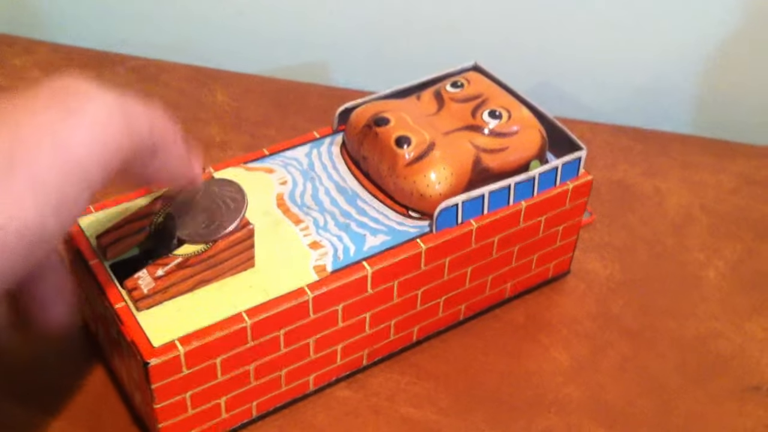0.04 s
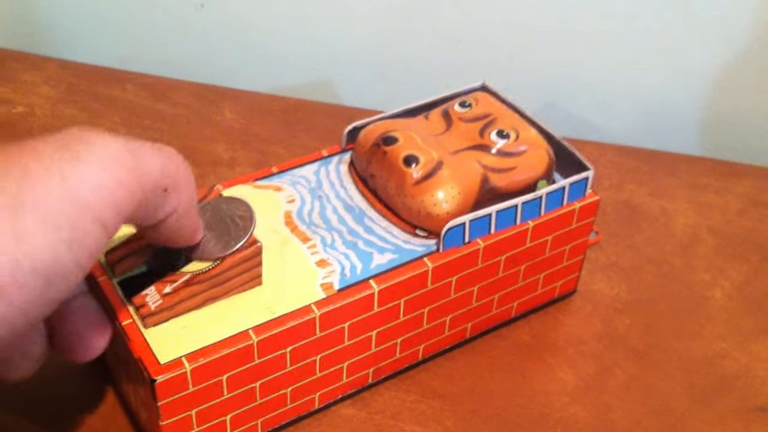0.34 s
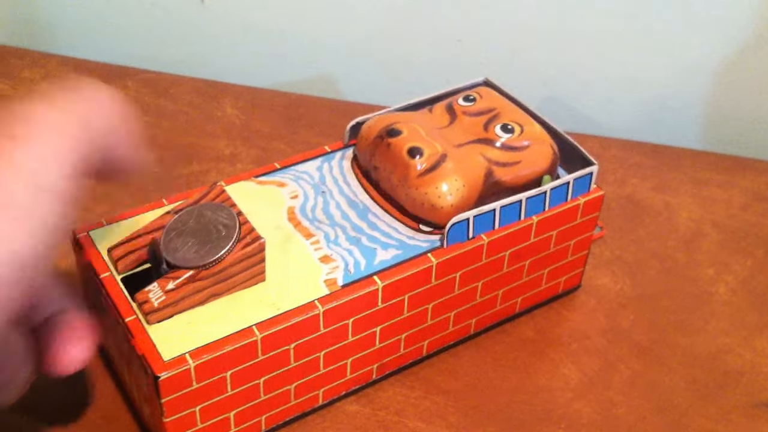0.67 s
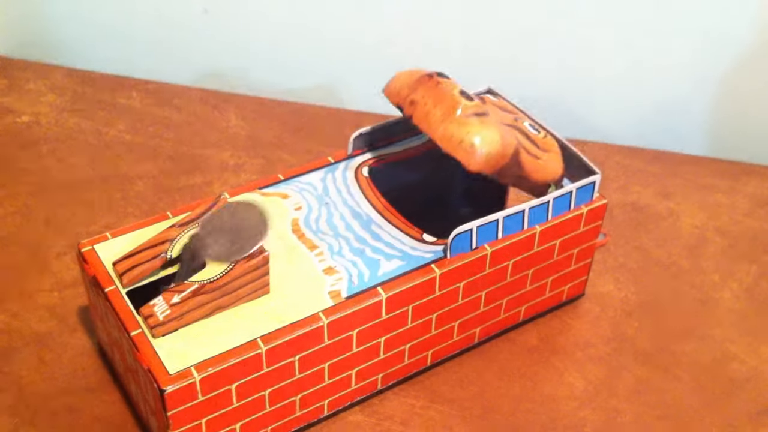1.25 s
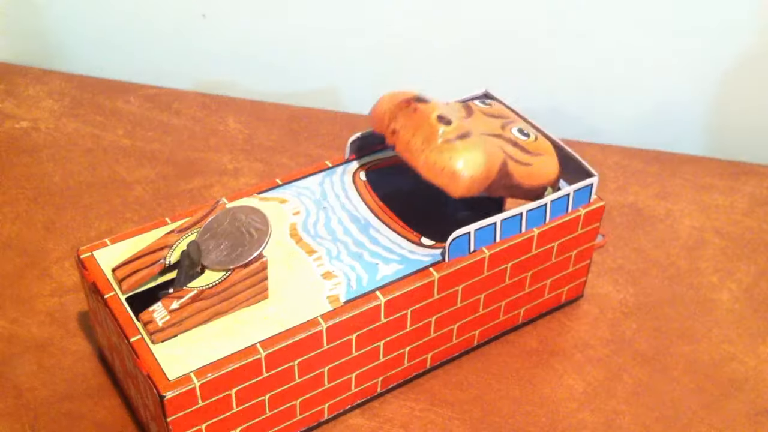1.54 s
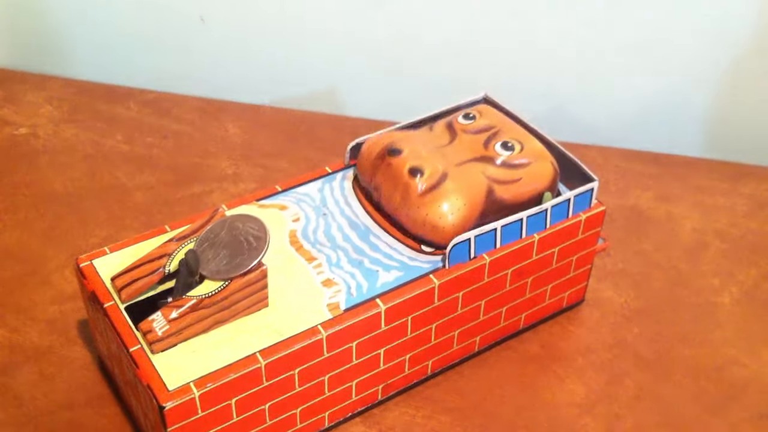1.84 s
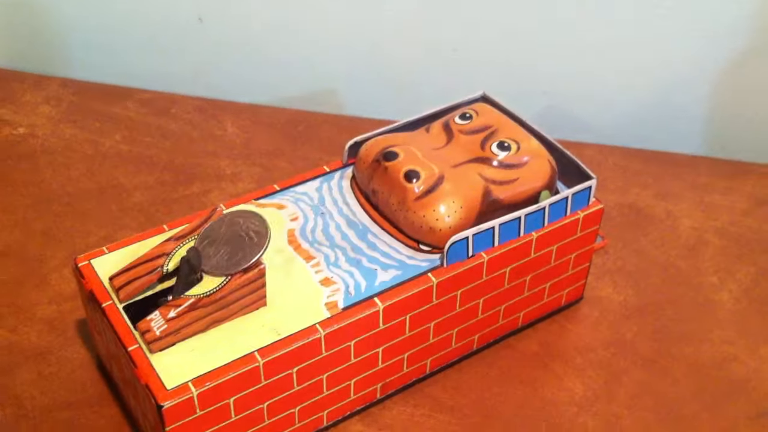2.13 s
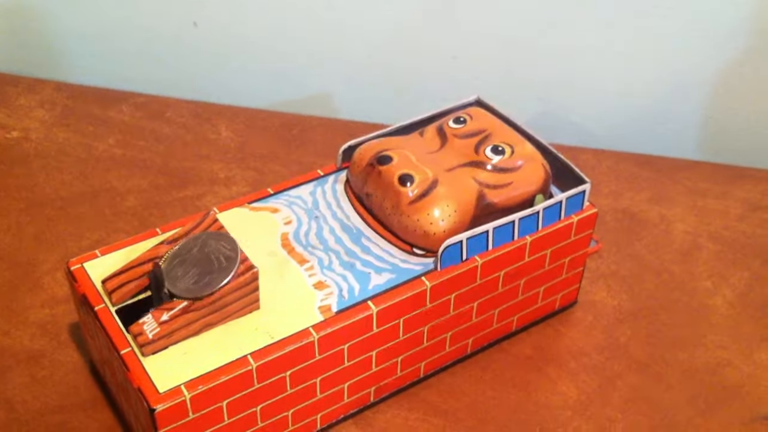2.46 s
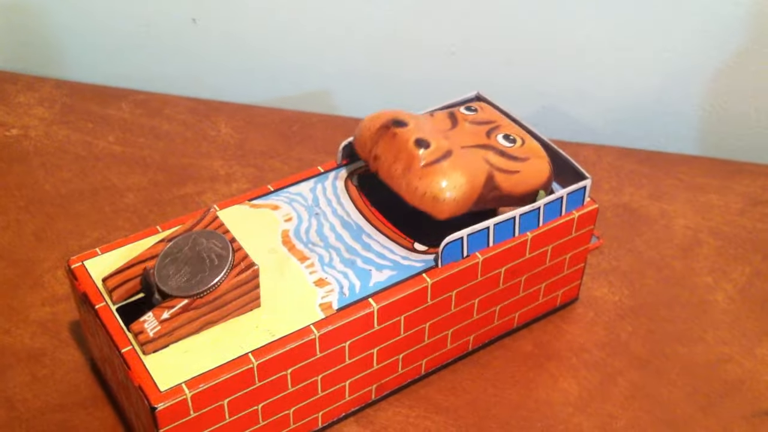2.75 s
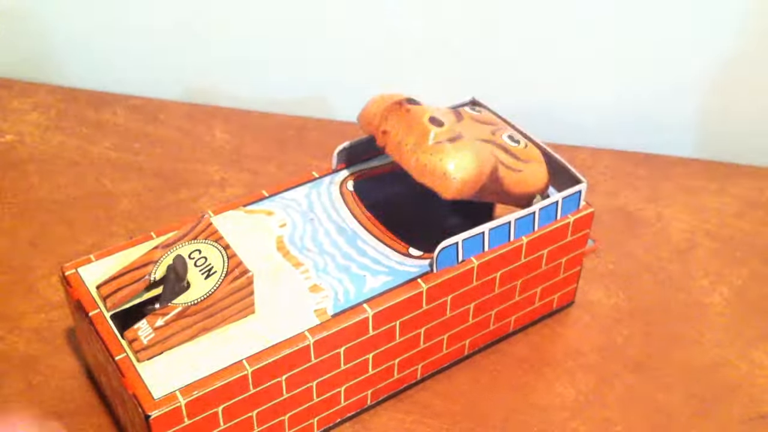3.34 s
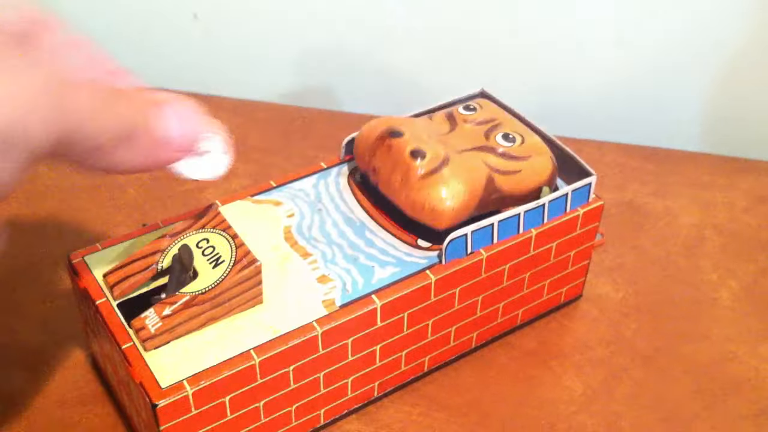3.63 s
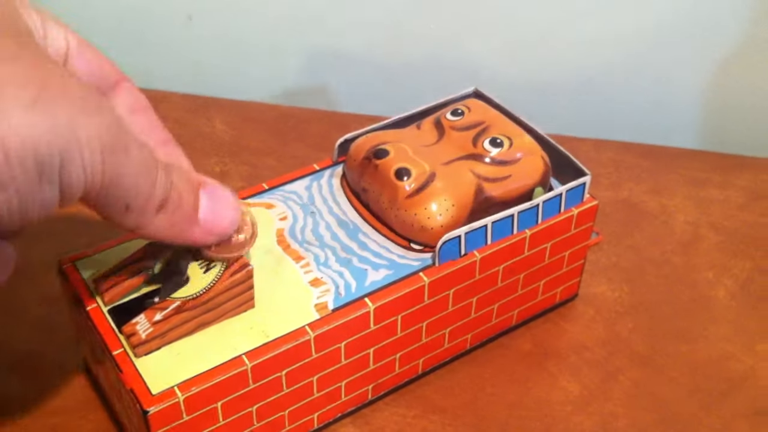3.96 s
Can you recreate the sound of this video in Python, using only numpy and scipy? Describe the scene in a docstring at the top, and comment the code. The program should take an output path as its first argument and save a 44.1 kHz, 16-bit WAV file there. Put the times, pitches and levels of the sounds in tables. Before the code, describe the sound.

Close up in a quiet room, a wind-up tin toy gives faint squeaks and clicks, then jolts into a loud, buzzing whirr with scattered knocks. A coin drops inside with a clank and the motor runs on.

```python
"""A quiet room, with a clockwork tin coin bank on a table. Its lever squeaks and clicks, then the
spring motor jolts into motion: the escapement ticks some 150 times a second and loose gears chatter,
all ringing through the tin case. The linkage knocks now and then. A coin drops inside with a clank
that makes the automatic gain control duck."""
import sys
import numpy as np
from scipy import signal
from scipy.fft import rfft, irfft
from scipy.io import wavfile

SR = 44100
rng = np.random.default_rng(int(sys.argv[2]) if len(sys.argv) > 2 else 0)


def master_out(mix):
    """Clip the mix to full scale and print it as 16-bit PCM to the path in sys.argv[1]."""
    frames = np.transpose(np.atleast_2d(mix))
    ceiling = np.clip(frames, -1, 1)
    pcm = np.round(ceiling * 32767).astype(np.int16)
    wavfile.write(sys.argv[1], SR, pcm)


N = 176400
TIME = np.arange(N) / SR
MOTOR_START_S, TOOTH_JITTER_S, TOOTH_SPREAD_DB = .646, .00013, 3

# pace of the escapement: time_s, teeth_per_s
MOTOR_SPEED = [(.65, 156), (.9, 151), (1.14, 143), (1.37, 172), (1.5, 169), (1.7, 163), (2.2, 156),
               (2.4, 137), (2.65, 152), (2.8, 155), (3.0, 145), (3.16, 160), (3.4, 158), (4.0, 157)]
# three faders riding the rattle, ahead of each band's trim: time_s, treble_db, middle_db, lows_db
RATTLE_FADERS = [(0.68, -19, -22, -31.5), (0.76, -20.5, -23.5, -33), (0.92, -19, -20.5, -33),
                 (1.17, -20.5, -24.5, -34.5), (1.21, -18.5, -20.5, -32.5), (1.4, -17, -20.5, -32),
                 (1.5, -19, -23, -32), (1.59, -18.5, -21, -32), (1.97, -18, -22, -30.5),
                 (2.42, -20, -21.5, -33), (2.52, -22, -24, -34.5), (2.54, -22.5, -21, -32),
                 (2.59, -20, -23, -32.5), (2.71, -20, -20.5, -31.5), (3.07, -20.5, -21.5, -32),
                 (3.15, -18, -19.5, -30.5), (3.31, -20, -23.5, -33), (3.42, -20.5, -22.5, -31),
                 (3.65, -20, -23, -32), (3.86, -19.5, -22, -32)]
# swell of the case's bright ring: time_s, lift_db
RING_LIFT = [(.72, -6), (1.0, 1.5), (1.25, 2), (1.38, 0.5), (1.5, 1), (1.6, 5), (1.75, 2), (1.88, -1),
             (2.25, 1), (2.38, 2.5), (2.55, 0.5), (3.12, -1), (3.28, 5.5), (3.45, 3.5), (4.0, -0.5)]
# broad tone of the tin case: frequency_hz, relative_db
CASE_EQ = [(30, -54), (70, -47), (110, -27.5), (200, -27), (300, -20), (520, -14), (740, -20), (950, -8),
           (1400, -9), (1750, -7.5), (1950, -10), (2400, -11.5), (2750, -14.5), (3200, -6), (3900, -5),
           (4600, -4.5), (5300, -3.5), (6000, -0.5), (6900, -11.5), (8000, -5), (9500, 0), (11300, -2),
           (12200, -5.5), (14000, -8.5), (15700, -17)]
# resonances of the case's panels: pitch_hz, width_hz, lift_db
PANEL_RINGS = [(161, 15, 12), (300, 22, 8), (408, 60, 10), (574, 33, 9), (683, 32, 10), (795, 28, 17),
               (868, 12, 6), (910, 22, 10.5), (1046, 34, 10.5), (1275, 36, 11.5), (1500, 30, 4),
               (1552, 44, 10.5), (1660, 62, 7), (1829, 28, 6), (2667, 70, 14), (2848, 42, 10),
               (2963, 98, 11), (3225, 92, 4), (3568, 58, 9), (3790, 130, -3), (4196, 119, 4), (4405, 80, 7),
               (4727, 130, 5), (5030, 110, 3), (6230, 90, 3), (6380, 130, 9.5), (6590, 80, -3),
               (6724, 85, 5), (6887, 95, 9), (7167, 55, 9), (7250, 50, -2), (7429, 148, 11), (7775, 55, 8),
               (7885, 50, 4), (8132, 58, 6), (8222, 55, 7), (8355, 45, 6), (8513, 90, 4), (8790, 120, 5.5),
               (9020, 60, -3), (9110, 70, 3), (9218, 55, 6), (9330, 70, 5.5), (11139, 97, 3),
               (11495, 113, 5)]
# the coin lands and bounces: start_s, level_db, t60_s
COIN_HITS = [(3.3533, -4, 0.027), (3.358, -5, 0.024), (3.363, -11.5, 0.08)]
# tone of the coin's clank: frequency_hz, relative_db
COIN_EQ = [(60, -18), (250, -12), (350, 11), (600, 5.5), (900, 0), (1130, 15), (1300, 5), (1520, 3),
           (1750, 18.5), (2200, 6), (2700, 5.5), (4000, 6.5), (6500, -2.5), (10000, -3.5), (15000, 2.5)]
# the brake lets go: start_s, level_db, t60_s
BRAKE_HITS = [(.646, -5.5, 0.053)]
# resonances of that jolt: pitch_hz, width_hz, lift_db
BRAKE_RINGS = [(455, 41, 13.5), (1488, 50, 13.5), (3200, 240, 7)]
# the linkage hits one panel or another: start_s, level_db, t60_s, panel_hz
LINKAGE_HITS = [(0.977, -14, 0.051, 920), (1.042, -13, 0.099, 1540), (1.15, -19, .06, 1270),
                (1.381, -16, 0.076, 1255), (2.032, -13, .07, 1540), (2.09, -19, 0.048, 903),
                (2.217, -14, .06, 1040), (2.323, -18.5, 0.084, 1040), (2.678, -19.5, 0.065, 890),
                (2.784, -29, .07, 1539), (2.887, -20, 0.047, 1698), (3.155, -19, .09, 1049),
                (3.212, -19, 0.062, 947.5), (3.456, -12, 0.068, 1020), (3.588, -12.5, .08, 1060),
                (3.732, -14, 0.077, 1069)]
# clicks of the lever's catch: start_s, level_db, t60_s
CATCH_HITS = [(.4928, -56, .045), (.519, -50, .06), (.5665, -41.5, 0.055), (.5885, -42.5, 0.049),
              (.6105, -49, .022), (.6235, -46, .026)]
# the case's low drone: time_s, level_db
DRONE_FADER = [(.65, -65), (1.3, -64.5), (1.5, -55), (1.77, -54), (1.95, -62), (2.22, -53), (2.33, -75),
               (2.8, -62), (3.0, -69), (3.2, -58), (3.45, -62), (3.63, -52), (4.0, -56)]
# lever squeaks, one list of points per stroke: time_s, pitch_hz, level_db
SQUEAK_STROKES = [
    [(0.17, 8201, -80), (0.188, 8185, -75), (0.234, 8616, -80), (0.286, 8927, -76), (0.38, 8222, -84)],
    [(.262, 2400, -77), (.287, 2850, -76)],
    [(.322, 4350, -76), (.345, 4250, -78)],
    [(.388, 2400, -74), (.412, 2650, -75)],
]
# reflections off the walls: delay_s, level_db
WALL_ECHOES = [(.0047, -23.5), (.0083, -22.5), (0.013, -23.5), (.0197, -25.5)]
# tone of the room's noise bed: frequency_hz, relative_db
ROOM_EQ = [(30, -44), (85, -25), (140, -13), (180, -11), (230, -13.5), (280, -18.5), (430, -20),
           (900, -26.5), (2000, -31), (3500, -35), (4200, -31), (5500, -38), (8500, -41), (15500, -56)]
# steady hum in the room: pitch_hz, level_db
ROOM_HUM = [(151, -70), (202, -74), (241, -63.5)]


def motor(contacts_per_s=18000, contact_spread_db=2.5, wheel_teeth=6, tick_db=-14.5, flutter_db=.47):
    """The escapement strikes on every tooth; gear chatter swells with each tooth and wheel turn."""
    phase = np.cumsum(in_time(MOTOR_SPEED)[0]) / SR
    ticks = escapement(phase)
    contacts = (rng.random(N) < contacts_per_s / SR) * rng.choice([-1, 1], N)
    contacts = contacts * from_db(contact_spread_db * rng.standard_normal(N))
    swell = 1 + .062 * np.cos(2 * np.pi * phase) + .044 * np.cos(2 * np.pi * phase / wheel_teeth)
    flutter = from_db(flutter_db * unit_rms(smooth(rng.standard_normal(N), .015)))
    chatter = unit_rms(contacts) * swell
    thrum = from_db(-9.5 + 2 * drift(.032)) * lowpass(ticks, hz=910)  # the teeth shake the whole case
    rattle = unit_rms(chatter + from_db(tick_db) * ticks) + thrum
    running = smooth(TIME >= MOTOR_START_S, .0032)
    return rattle_force(rattle * flutter * running)


def escapement(phase):
    """One slightly uneven tick each time the phase passes a whole tooth."""
    on_beat = np.flatnonzero(np.diff(np.floor(phase)) > 0)
    lateness, strength = rng.standard_normal((len(on_beat), 2)).T
    landings = on_beat + (lateness * TOOTH_JITTER_S * SR).astype(int)
    ticks = np.zeros(N)
    ticks[np.clip(landings, 0, N - 1)] = from_db(TOOTH_SPREAD_DB * strength)
    return unit_rms(ticks)


def rattle_force(rattle):
    """The rattle's force wavers in three bands, each with its own fader and trim."""
    lows, upper = split(rattle, hz=2210)
    middle, treble = split(upper, hz=6040)
    treble_db, middle_db, lows_db = in_time(RATTLE_FADERS)
    return (treble * from_db(treble_db + .5)
            + middle * from_db(middle_db + 3.5)
            + lows * from_db(lows_db + 12.5))


def bright_ring(x, pitch_hz=6250, width_hz=260):
    """One bright ring of the case swells and fades as the mechanism moves."""
    ring = signal.lfilter(*signal.iirpeak(pitch_hz, pitch_hz / width_hz, fs=SR), x)
    return x + ring * (from_db(in_time(RING_LIFT)[0]) - 1)


def tin_case(x, swell_db=1.64, swell_s=.017):
    """Every hit sounds through the panels, whose rings swell and fade as the contacts move."""
    x = colour(x, CASE_EQ)
    for hz, width_hz, lift_db in PANEL_RINGS:
        ring = resonate(x, hz, width_hz, lift_db) - x
        x = x + ring * from_db(swell_db * drift(swell_s))
    return x * from_db(-4)


def metal_hits(hits, attack_s=.0009):
    """Each hit sets off a dense shiver of thin metal that dies away."""
    power = sum((TIME >= start_s) * from_db(db - 60 * np.maximum(TIME - start_s, 0) / t60_s) ** 2
                for start_s, db, t60_s in hits)
    return smooth(np.sqrt(power), attack_s) * rng.standard_normal(N)


def coin_drop():
    """The coin hits the floor of the case, bounces and rings out briefly."""
    return colour(metal_hits(COIN_HITS), COIN_EQ)


def brake_jolt():
    """The brake lets go with a dull, ringing clunk."""
    _, jolt = split(metal_hits(BRAKE_HITS), hz=260)
    for hz, width_hz, lift_db in BRAKE_RINGS:
        jolt = resonate(jolt, hz, width_hz, lift_db)
    return lowpass(jolt, hz=1710, order=1)


def linkage_knocks():
    """Muted knocks, each pitched by the panel the linkage strikes."""
    knocks = sum(resonate(metal_hits([hit]), panel_hz, width_hz=69, lift_db=13)
                 for *hit, panel_hz in LINKAGE_HITS)
    return lowpass(knocks, hz=1120, order=1)


def lever_clicks():
    """The lever's catch gives light, bright clicks."""
    return resonate(metal_hits(CATCH_HITS), hz=9300, width_hz=650, lift_db=5.5) * from_db(-4)


def case_drone():
    """The whole case hums at the tooth rate, a little unsteady in pitch and level."""
    pitch_hz = in_time(MOTOR_SPEED)[0] * (1 + .018 * drift(.018))
    level_db = in_time(DRONE_FADER)[0] + 2.3 * drift(.02)
    return smooth(TIME >= MOTOR_START_S, .01) * tone(np.cumsum(pitch_hz) / SR, level_db)


def lever_squeak(stroke):
    """A faint, thin whistle as the lever slides."""
    pitch_hz, level_db = in_time(stroke)
    sliding = smooth((TIME > stroke[0][0]) & (TIME < stroke[-1][0]), .004)
    return sliding * tone(np.cumsum(pitch_hz) / SR, level_db)


def walls(x):
    """Nearby walls add early reflections."""
    return x + sum(from_db(db) * np.pad(x, (int(delay_s * SR), 0))[:N] for delay_s, db in WALL_ECHOES)


def room_tone(bed_db=-62):
    """A soft bed of noise with a low hum."""
    hum = sum(tone(hz * TIME, db) for hz, db in ROOM_HUM)
    return from_db(bed_db) * colour(rng.standard_normal(N), ROOM_EQ) + hum


def from_db(db):
    """Decibels to gain."""
    return 10 ** (np.asarray(db) / 20)


def unit_rms(x):
    """Scale to unit power."""
    return x / np.sqrt(np.mean(x ** 2) + 1e-20)


def tone(cycles, rms_db):
    """A sine that follows a running count of cycles."""
    return np.sqrt(2) * from_db(rms_db) * np.sin(2 * np.pi * cycles)


def in_time(rows):
    """One automation curve for each column after the time."""
    times_s, *columns = np.transpose(rows)
    return [np.interp(TIME, times_s, column) for column in columns]


def smooth(x, seconds):
    """One-pole lag."""
    pole = np.exp(-1 / (seconds * SR))
    return signal.lfilter([1 - pole], [1, -pole], x + 1e-18)


def drift(seconds):
    """Smooth random wander at unit power."""
    return unit_rms(smooth(smooth(rng.standard_normal(N), seconds), seconds))


def lowpass(x, hz, order=2):
    """Roll off the top."""
    return signal.sosfilt(signal.butter(order, hz, fs=SR, output="sos"), x + 1e-18)


def split(x, hz):
    """Crossover into a low and a high band."""
    filters = [signal.butter(2, hz, kind, fs=SR, output="sos") for kind in ("low", "high")]
    return [signal.sosfilt(np.tile(sos, (2, 1)), x) for sos in filters]


def colour(x, eq, size=8192):
    """Minimum-phase EQ; white noise keeps its power."""
    hz, db = np.transpose(eq)
    grid_hz = np.maximum(np.arange(size // 2 + 1) * SR / size, 1)
    gain = from_db(np.interp(np.log(grid_hz), np.log(hz), db))
    cepstrum = irfft(np.log(gain))
    cepstrum[0], cepstrum[size // 2:] = 0, 0  # nothing rings ahead of a hit
    response = irfft(np.exp(rfft(2 * cepstrum)))
    return signal.fftconvolve(x, response / np.linalg.norm(response))[:N]


def resonate(x, hz, width_hz, lift_db):
    """Bell EQ: a ringing peak, or a dip if the lift is negative."""
    damping = np.pi * width_hz / SR
    tuning = -2 * np.cos(2 * np.pi * hz / SR)
    lifted = damping * from_db(lift_db)
    return signal.lfilter([1 + lifted, tuning, 1 - lifted], [1 + damping, tuning, 1 - damping], x)


def scene():
    """The toy up close and dead centre, over the room tone."""
    mechanism = bright_ring(motor()) + lever_clicks() + brake_jolt() + linkage_knocks() + coin_drop()
    squeaks = sum(map(lever_squeak, SQUEAK_STROKES))
    mono = walls(tin_case(mechanism)) + case_drone() + squeaks + room_tone()
    return np.stack([mono, mono])


def record(dry, threshold_db=-14.5, window_s=.0055, attack_s=.0041, release_db_per_s=1.5,
           low_cut_hz=47, high_cut_hz=15750):
    """Gain control ducks on a loud peak and recovers slowly; then soft clipping, low cut and high cut."""
    level_db = 10 * np.log10(smooth(dry[0] ** 2, window_s))
    over_db = np.maximum(level_db - threshold_db, 0)
    release_db = release_db_per_s * TIME
    duck_db = np.maximum.accumulate(over_db + release_db) - release_db
    out = np.tanh(dry * from_db(-smooth(duck_db, attack_s)))
    out = signal.sosfilt(signal.butter(1, low_cut_hz, "high", fs=SR, output="sos"), out)
    return signal.sosfilt(signal.ellip(12, .1, 80, high_cut_hz, fs=SR, output="sos"), out)


dry = scene()
out = record(dry)
master_out(out)
```